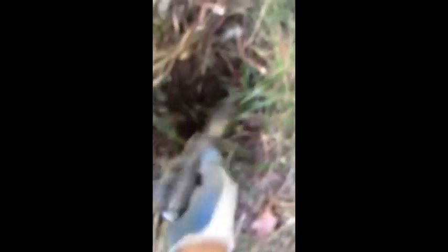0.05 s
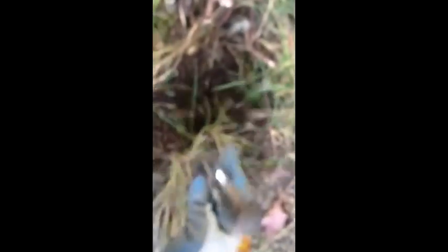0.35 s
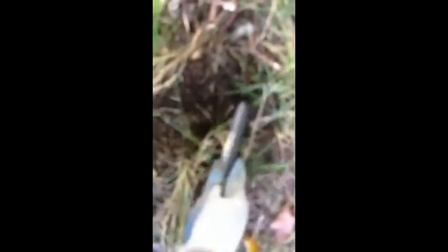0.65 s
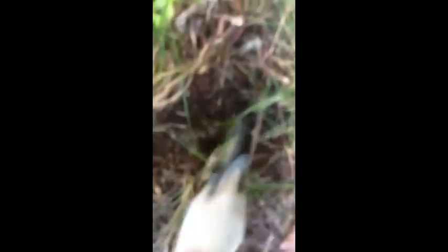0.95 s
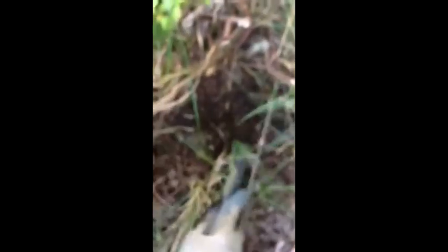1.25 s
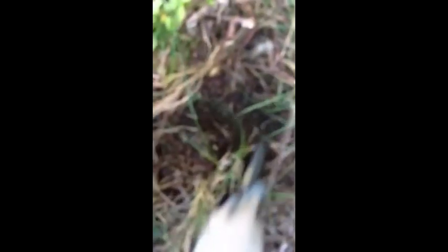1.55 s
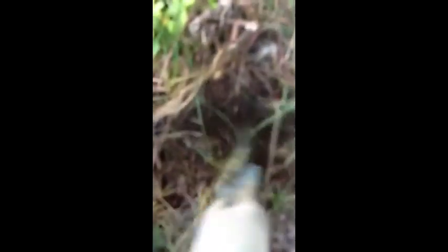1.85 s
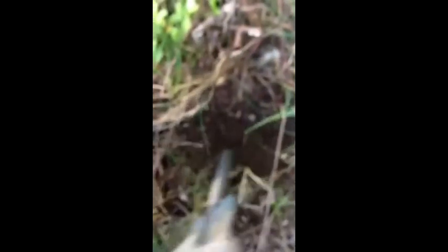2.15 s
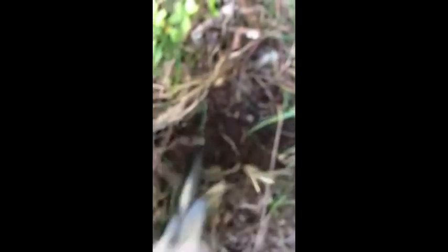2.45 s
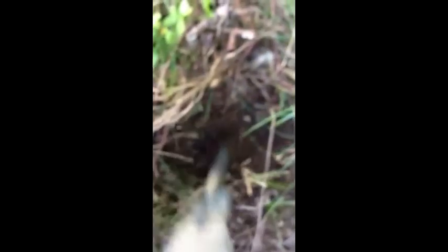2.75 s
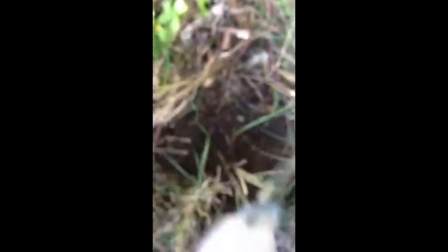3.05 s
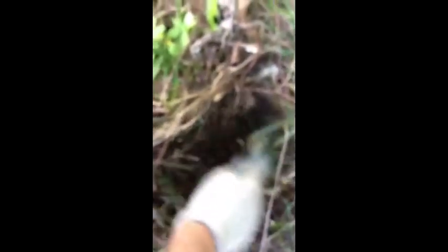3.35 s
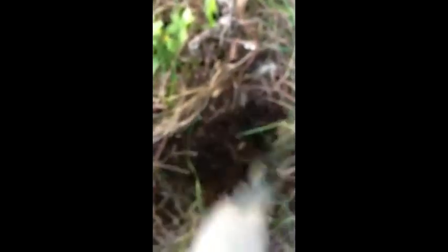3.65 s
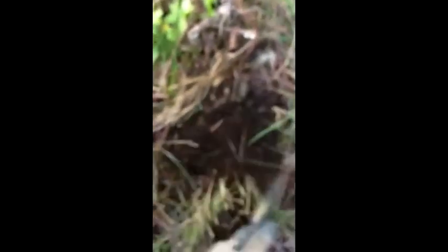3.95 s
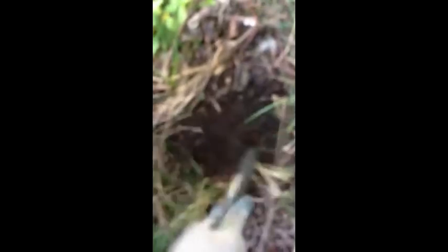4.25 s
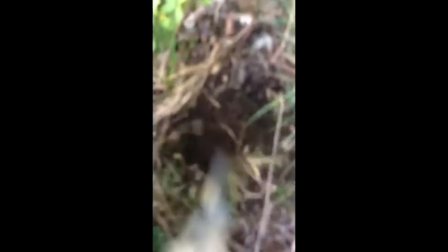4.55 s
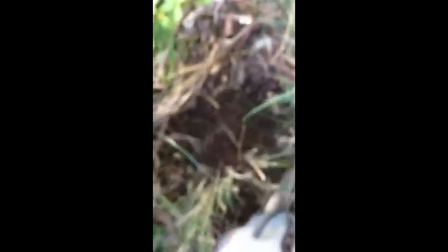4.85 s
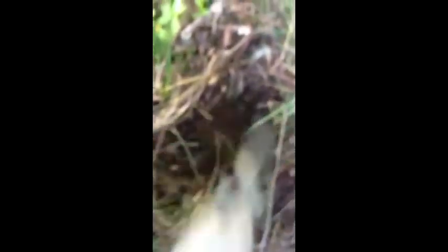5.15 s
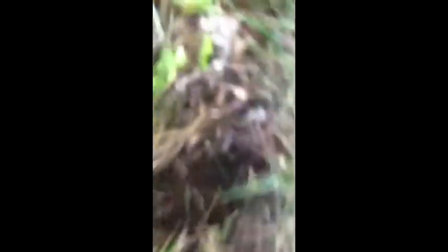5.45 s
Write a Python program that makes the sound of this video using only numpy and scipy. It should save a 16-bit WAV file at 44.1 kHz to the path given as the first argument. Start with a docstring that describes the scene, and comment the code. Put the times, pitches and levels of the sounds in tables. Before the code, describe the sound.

Close, uneven digging strokes crunch through dirt and dry stalks outdoors, with light knocks, one clink and roots finally tearing loose.

```python
"""Digging with a small blade

A gloved hand works a small blade through loose soil and dry grass, close by and outdoors.
Each stroke grinds crumbs and brushes stalks, making thousands of tiny contacts. Twigs tick,
the blade knocks now and then and clinks once on a stone, and near the end a clump of roots tears
with two sharp snaps. Behind it all is a low rumble like distant traffic."""
import sys
import numpy as np
from scipy import signal
from scipy.fft import rfft, irfft, next_fast_len
from scipy.io import wavfile
from scipy.ndimage import uniform_filter1d, map_coordinates

SR = 44100
rng = np.random.default_rng(int(sys.argv[2]) if len(sys.argv) > 2 else 0)


def unload_wav(signal):
    """Save mono or channel-first audio to the path in sys.argv[1] as 16-bit WAV at rate SR, clipped to [-1, 1]."""
    wavfile.write(
        sys.argv[1],
        SR,
        np.round(np.clip(np.atleast_2d(signal).T, -1, 1) * 32767).astype(np.int16),
    )


N = 251370
TOP_HZ = 15600  # the highest pitch kept
REST_GRASS_DB, REST_SOIL_DB, REST_DRY_DB = -70, -70.5, 4  # the glove stirs between strokes

# Strokes of the blade. Each row: time of the hardest push, swell time and fade time in seconds,
# then grass rustle, soil scrape and extra treble from dry stalks in dB.
BLADE_STROKES = [(.17, .06, .09, -62, -66, 4.5), (.345, 0.11, 0.078, -57.5, -64, 3.5),
                 (.625, 0.075, 0.073, -55.5, -61, 4), (.752, 0.021, 0.039, -57.5, -60, 4.5),
                 (.88, 0.11, 0.035, -58.5, -62, 4), (1.032, .055, .025, -54.5, -56.5, 1.5),
                 (1.095, 0.055, 0.062, -43.5, -49, 1.5), (1.283, 0.06, 0.056, -43.5, -49, 1),
                 (1.383, 0.026, 0.024, -43, -52, -2), (1.428, 0.024, 0.025, -41, -45.5, -4.5),
                 (1.52, 0.12, 0.057, -56, -63.5, 1), (1.63, 0.077, 0.089, -54.5, -58.5, 2),
                 (1.98, 0.074, 0.048, -47.5, -53.5, 2.5), (2.11, 0.048, 0.046, -52, -59.5, 0),
                 (2.255, 0.089, 0.067, -48.5, -53, 0), (2.36, 0.062, 0.039, -45, -51.5, -3),
                 (2.475, 0.043, 0.058, -44, -49.5, -0.5), (2.58, 0.075, 0.11, -50.5, -55, -3.5),
                 (2.67, 0.11, 0.055, -49.5, -53, -0.5), (2.82, 0.073, .06, -52, -56.5, -3),
                 (2.897, 0.055, 0.067, -47.5, -53, 1.5), (3.065, 0.064, 0.065, -55, -60.5, 0),
                 (3.25, 0.068, 0.062, -52.5, -56.5, 2.5), (3.37, 0.043, 0.093, -58, -57.5, 5.5),
                 (3.575, 0.03, 0.023, -56.5, -56, 3), (3.705, 0.077, 0.05, -51, -54.5, 3),
                 (3.86, 0.074, 0.057, -54.5, -58, 5), (3.975, 0.069, 0.06, -49.5, -55.5, 1.5),
                 (4.168, 0.057, 0.045, -42.5, -47, 2), (4.252, 0.035, 0.032, -44.5, -51, -0.5),
                 (4.295, 0.038, 0.043, -46, -52.5, 0), (4.42, 0.062, 0.081, -47.5, -50, 3),
                 (4.625, 0.13, 0.053, -45.5, -49, 0), (4.715, 0.068, 0.066, -42.5, -51, 0),
                 (4.85, .09, 0.12, -53, -63, -1), (5.064, 0.067, 0.051, -49.5, -52.5, 3.5),
                 (5.21, 0.05, 0.13, -57, -61.5, 4), (5.338, 0.037, 0.035, -41.5, -48, -3),
                 (5.395, 0.048, 0.03, -33, -41, -7), (5.469, 0.032, 0.043, -30.5, -42, 0),
                 (5.605, 0.08, 0.098, -47, -49, -4)]
def effort():
    """The hand's strokes add up in power, giving grass level, soil level and dryness in dB."""
    grass, soil = np.full(N, amp(REST_GRASS_DB) ** 2), np.full(N, amp(REST_SOIL_DB) ** 2)
    dryness = grass * REST_DRY_DB
    for s, rise_s, fall_s, grass_db, soil_db, dry_db in BLADE_STROKES:
        push = amp(swell(s, rise_s, fall_s)) ** 2
        grass += push * amp(grass_db) ** 2
        soil += push * amp(soil_db) ** 2
        dryness += push * amp(grass_db) ** 2 * dry_db
    return 10 * np.log10(grass), 10 * np.log10(soil), dryness / grass


def digging(grass_db, soil_db, dry_db):
    """The blade catches and slips, so grass, crumbs and earth all flutter in loudness together."""
    slip = wobble(per_s=90)
    return (grass_rustle(dry_db) * amp(grass_db + 1.16 * slip)
            + soil_scrape() * amp(soil_db + 2.0 * slip)
            + moving_earth(soil_db) * amp(1.1 * slip))


# The bright tone of brushed grass. Each row: pitch in Hz, relative level in dB.
GRASS_TONE = [(1200, -24), (2700, -9.5), (3200, -2.5), (3900, -0.5), (4900, -0.5), (6200, -2.5), (8000, -5),
              (10500, -8.5), (13500, -9), (15500, -17)]
def grass_rustle(dry_db):
    """Glove and blade brush the stalks; drier stalks give a finer, brighter hiss."""
    contacts = grains(per_s=1700, centre_hz=6000, spread=0.55, cycles=1.35, scatter_db=3.5)
    stalks = shifting(friction(contacts, GRASS_TONE, grainy=0.33), depth_db=1.64)
    dull = signal.sosfiltfilt(signal.butter(3, 7500, fs=SR, output="sos"), stalks)
    return dull + (stalks - dull) * amp(dry_db)


# The tone of scraped soil. Each row: pitch in Hz, relative level in dB.
SOIL_TONE = [(300, -16.5), (700, -8), (1050, -6), (1350, -0.5), (1850, 0.5), (2150, -1), (2650, -5),
             (4000, -16), (9000, -30.5)]
def soil_scrape():
    """The blade grinds over loose crumbs, and each one gives a tiny click."""
    contacts = grains(per_s=1100, centre_hz=1703, spread=0.464, cycles=3.0, scatter_db=4.5, size=320)
    return shifting(friction(contacts, SOIL_TONE, grainy=0.26), depth_db=2.5)


# The low tone of pushed earth. Each row: pitch in Hz, relative level in dB.
EARTH_TONE = [(50, -51), (150, -17.5), (290, 1.5), (380, 0), (520, -13.5), (750, -11), (1400, -24)]
# Lumps pushed aside. Each row: peak time in seconds, swell and fade time in seconds, level in dB.
EARTH_SHOVES = [(1.2, 0.13, -61.5), (1.41, 0.085, -55.5), (1.63, 0.047, -59), (1.94, .04, -62),
                (2.25, 0.048, -63), (2.505, 0.026, -54), (4.05, 0.33, -57), (4.7, 0.17, -61.5),
                (5.397, 0.045, -54.5)]
def moving_earth(soil_db, rest_db=-74, follows=0.43):
    """A harder scrape stirs more earth, and now and then the blade levers a lump aside."""
    stir = amp(rest_db + follows * (soil_db - REST_SOIL_DB))
    shoves = sum(amp(db + swell(s, width_s, width_s)) for s, width_s, db in EARTH_SHOVES)
    return noise(EARTH_TONE) * np.hypot(stir, shoves)


# Longer-ringing sounds: blade knocks, a stalk's squeak and the low ring of snapping roots.
# Each row: start in seconds, peak level in dB, ring pitch in Hz.
KNOCKS_AND_RINGS = [(1.061, -32, 1650), (1.3008, -32, 1280), (1.808, -39, 3540), (2.249, -28.5, 1984),
                    (2.257, -30.5, 3980), (2.4657, -29.5, 3860), (2.475, -31.5, 2030), (4.1758, -33, 2060),
                    (4.244, -34, 5400), (4.251, -31, 5700), (4.5595, -36, 1600), (5.128, -41, 2300),
                    (5.315, -31, 4300), (5.364, -19.5, 2190), (5.3679, -22.5, 1460), (5.3912, -23, 1240),
                    (5.4685, -25, 1045), (5.4863, -27, 1750), (5.6075, -32.5, 1100), (5.629, -35, 4500),
                    (5.654, -32, 4300)]
# Stalks and roots breaking. Each row: start in seconds, peak level in dB, ring pitch in Hz.
FIBRE_SNAPS = [(.669, -41, 6500), (.7595, -41, 3900), (.866, -34.5, 7500), (.91, -38.5, 1810),
               (.951, -45, 4000), (1.0617, -30, 4500), (1.0783, -29, 6800), (1.0955, -31.5, 4500),
               (1.1046, -26, 6300), (1.1185, -29.5, 5500), (1.125, -33, 5300), (1.2328, -34.5, 1590),
               (1.27, -30, 5200), (1.286, -32, 1400), (1.3746, -26.5, 6100), (1.381, -29, 3810),
               (1.385, -28, 3580), (1.3916, -28, 5300), (1.4275, -31, 4000), (1.4355, -31, 2000),
               (1.6117, -30.5, 5300), (1.6234, -36, 13500), (1.644, -38, 6200), (2.369, -29, 4700),
               (2.5146, -38, 4500), (2.7286, -37, 4300), (3.0573, -30.5, 5450), (3.0952, -43, 5500),
               (3.1123, -42, 6500), (3.3471, -41, 11000), (3.3522, -41, 6000), (3.715, -37, 5500),
               (4.1748, -29.5, 5800), (4.2995, -36, 4500), (4.5044, -31, 4400), (4.622, -28, 5760),
               (4.637, -31, 4200), (4.7165, -27, 5080), (4.7875, -32, 5730), (4.8083, -35, 3200),
               (4.8427, -30.5, 5760), (4.8761, -36, 6000), (4.9576, -34, 4720), (4.9989, -31.5, 5430),
               (5.005, -39, 6000), (5.1285, -32, 3860), (5.3707, -25, 6200), (5.391, -7, 6400),
               (5.3918, -15, 2390), (5.4003, -21, 5800), (5.4048, -16.5, 4870), (5.416, -17, 6050),
               (5.4524, -17, 4640), (5.458, -16, 10000), (5.462, -13, 5970), (5.4683, -2.3, 5230),
               (5.472, -20, 8400), (5.6073, -28, 4530), (5.6286, -28, 4580), (5.6536, -28.5, 4130),
               (5.6605, -30.5, 6200)]
def knocks_and_snaps(grass_db, low_cut_hz=347):
    """Breaking fibres ring briefly, thick ones most; knocks, a squeak and low root notes ring longer."""
    out = np.zeros(N + SR)
    for s, db, hz in KNOCKS_AND_RINGS:
        out[round(s * SR):][:SR // 16] += snap(db, hz, ring_s=0.017, ring_db=-2)
    for s, db, hz in [*FIBRE_SNAPS, *twigs(grass_db)]:
        out[round(s * SR):][:SR // 16] += snap(db, hz, ring_s=0.0044, ring_db=2 + 0.11 * db)
    # snaps and knocks alike keep out of the deep bass
    return signal.sosfilt(signal.butter(2, low_cut_hz, "highpass", fs=SR, output="sos"), out[:N])


# The tone of a sharp crack. Each row: pitch in Hz, relative level in dB.
CRACK_TONE = [(40, -52), (200, -20), (700, -19), (1400, -1.5), (2000, -8.5), (2700, -4.5), (3600, 4),
              (7000, 1), (10000, -6), (14000, -9.5), (15500, -18)]
def snap(db, hz, ring_s, ring_db, crack_s=0.0033, fray_s=0.049):
    """Something gives way: it cracks, rings and frays, each fading by 60 dB in its own time."""
    t = np.arange(SR // 16) / SR
    grit, drag = rng.standard_normal((2, len(t)))
    # soil drags on the ringing fibre, blurring its pitch and choking it
    ring = amp(ring_db - 60 * t / ring_s) * np.sin(2 * np.pi * hz * t + 0.056 * np.cumsum(drag))
    crack = amp(-6 - 60 * (t / crack_s) ** 1.34)
    fray = amp(-22 - 60 * t / fray_s)
    onset = 1 - np.exp(-t / 0.00015)
    sound = (ring + (crack + fray) * unit(coloured(grit, CRACK_TONE))) * onset
    return amp(db) * sound / np.abs(sound).max()


def twigs(grass_db, per_s=22, rest_db=-56.5, follows=0.66, scatter_db=2.5, centre_hz=4600):
    """Small twigs tick at random, louder in a harder stroke. Gives rows like those of FIBRE_SNAPS."""
    count = int(per_s * N / SR)
    at = rng.integers(0, N, count)
    strength, pitch = rng.standard_normal((count, 2)).T
    db = rest_db + follows * (grass_db[at] - REST_GRASS_DB) + scatter_db * strength
    return np.column_stack([at / SR, db, centre_hz * np.exp(0.366 * pitch)])


# The blade skipping on a stone. Each row: start in seconds, peak level in dB.
STONE_TOUCHES = [(0.8304, -35), (0.8334, -20), (0.8353, -30), (.8379, -30.5)]
# The blade's own notes, damped by the glove.
# Each row: pitch in Hz, relative level in dB, seconds to fade by 60 dB.
BLADE_NOTES = [(1300, -19, .035), (2870, -17, .018), (3330, -4.5, 0.013), (3730, -3.5, .014),
               (4230, -5, .011), (5800, 0, .007), (6900, -8, .009), (8000, -3, 0.0055),
               (8630, -0.5, 0.0058), (9560, 1, .006)]
def stone_clink(crack_db=6, crack_s=0.0028):
    """Each touch on the stone is a hard tick that sets the steel ringing; they blur into one clink."""
    out, t = np.zeros(N + SR), np.arange(SR // 16) / SR
    for s, db in STONE_TOUCHES:
        ring = np.zeros(len(t))
        for hz, note_db, fade_s in BLADE_NOTES:
            fade = amp(note_db + rng.normal(0, 1.5) - 60 * t / fade_s)
            ring += fade * np.sin(2 * np.pi * (hz * t + rng.random()))
        grit = unit(coloured(rng.standard_normal(len(t)), CRACK_TONE))
        sound = ring + grit * amp(crack_db - 60 * t / crack_s)
        out[round(s * SR):][:len(t)] += amp(db) * sound / np.abs(sound).max()
    return out[:N]


# The tones of the far rumble and the outdoor hiss. Each row: pitch in Hz, relative level in dB.
RUMBLE_TONE = [(25, -39), (50, -38), (78, -21.5), (95, -10.5), (108, -13), (125, -5.5), (170, 0),
               (181, -0.5), (191, 4), (204, 0.5), (260, -6.5), (400, -20.5), (800, -35)]
AIR_TONE = [(200, -6), (600, 1.5), (1200, 5), (2000, -3.5), (2700, 1), (5000, -7), (9000, -8.5),
            (15000, -14)]
# How the rumble rises and falls. Each row: time in seconds, level in dB.
RUMBLE_SWELLS = [(0, -57), (.15, -55.5), (.35, -59.5), (.68, -59), (.78, -54), (1.1, -57.5), (1.58, -56),
                 (1.7, -52.5), (2, -55.5), (2.35, -54), (2.95, -56.5), (3.4, -57), (3.85, -53),
                 (3.98, -57.5), (4.35, -55), (5.7, -58)]
def outdoors(hiss_db=-64):
    """Far traffic swells slowly under a faint, even hiss."""
    rumble_db = np.interp(np.arange(N) / SR, *np.transpose(RUMBLE_SWELLS))
    rumble = noise(RUMBLE_TONE) * amp(rumble_db + 1.5 * wobble(per_s=14))
    return rumble + noise(AIR_TONE) * amp(hiss_db)


def grains(per_s, centre_hz, spread, cycles, scatter_db, size=160):
    """Tiny contacts at random times, each a fading ring with its own pitch and strength."""
    count = int(per_s * N / SR)
    _, pitch, strength, direction = rng.standard_normal((count, 4)).T[:, :, None]
    start = rng.integers(0, N, (count, 1))
    hz = np.clip(centre_hz * np.exp(spread * pitch), 300, TOP_HZ)
    turns = hz * np.arange(size) / SR
    ring = np.sin(2 * np.pi * turns) * np.exp(-turns / cycles)
    ring *= np.sqrt(hz) * np.sign(direction) * amp(scatter_db * np.minimum(strength, 2.5))
    return unit(np.bincount((start + np.arange(size)).ravel(), ring.ravel(), N)[:N])


def friction(contacts, tone, grainy):
    """Separate contacts over a hiss of countless finer ones; grainy is their share of the power."""
    return np.sqrt(grainy) * unit(coloured(contacts, tone)) + np.sqrt(1 - grainy) * noise(tone)


def shifting(x, depth_db, size=256):
    """The contact keeps changing, so different pitches stand out for a moment and vanish."""
    bands = signal.stft(x, nperseg=size)[2]
    patches = uniform_filter1d(rng.standard_normal(bands.shape), size=3, axis=0)  # smooth over pitch
    patches = uniform_filter1d(patches, size=7, axis=1)  # and over time
    return unit(signal.istft(bands * amp(depth_db * unit(patches)), nperseg=size)[1][:N])


def swell(peak_s, rise_s, fall_s, drop_db=8.5, shape=1.44):
    """A push in dB: it builds to 0, then eases off. Shape 1 is pointed and 2 is rounded."""
    t = np.arange(N) / SR - peak_s
    return np.maximum(-drop_db * np.maximum(-t / rise_s, t / fall_s) ** shape, -120)


def wobble(per_s):
    """A smooth curve through per_s random values each second."""
    points = rng.standard_normal(int(N * per_s / SR) + 4)
    return map_coordinates(points, [np.arange(N) * per_s / SR])


def coloured(x, tone):
    """Shape a sound with a tone table, keeping the sharp front of each click."""
    size = 2 * next_fast_len(len(x) // 2 + 2048)
    hz, db = np.transpose(tone)
    gain = amp(np.interp(np.log(np.fft.rfftfreq(size, 1 / SR) + 1), np.log(hz), db))
    # fold the filter so that it rings only after a click, never before
    cepstrum = irfft(np.log(gain))
    cepstrum[1:size // 2] *= 2
    cepstrum[size // 2 + 1:] = 0
    return irfft(rfft(x, size) * np.exp(rfft(cepstrum)), size)[:len(x)]


def noise(tone):
    """Steady noise with the given tone, at an average level of 1."""
    return unit(coloured(rng.standard_normal(N), tone))


def amp(db):
    """Turn decibels into a number to multiply by."""
    return 10 ** (np.asarray(db) / 20)


def unit(x):
    """Scale to an average (rms) level of 1."""
    return x / np.sqrt(np.mean(x ** 2) + 1e-20)


def scene():
    """All the sounds together in one channel, in open air with no echo."""
    grass_db, soil_db, dry_db = effort()
    mix = digging(grass_db, soil_db, dry_db) + outdoors() + knocks_and_snaps(grass_db) + stone_clink()
    return mix[None]


def record(dry):
    """The small microphone loses deep bass, and everything above TOP_HZ is cut away."""
    thin = signal.sosfilt(signal.butter(2, 45, "highpass", fs=SR, output="sos"), dry)
    size = next_fast_len(N + SR // 2)
    return irfft(rfft(thin, size) * (np.fft.rfftfreq(size, 1 / SR) < TOP_HZ), size)[:, :N]


dry = scene()
out = record(dry)
unload_wav(out)
```